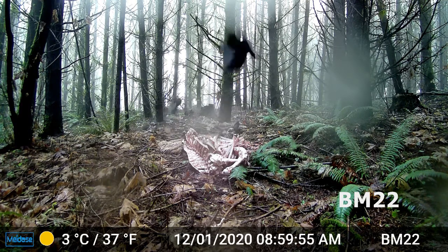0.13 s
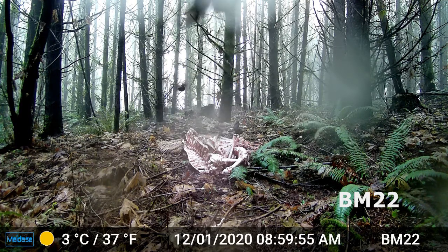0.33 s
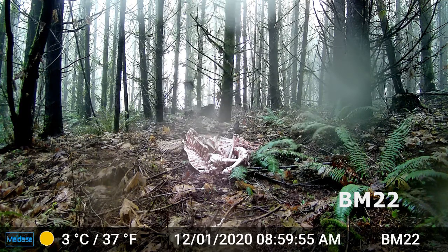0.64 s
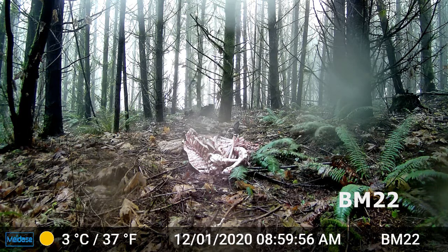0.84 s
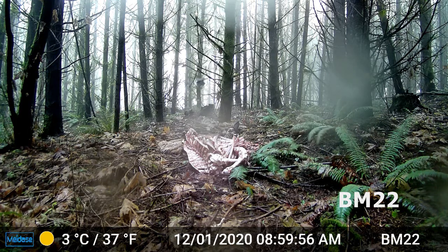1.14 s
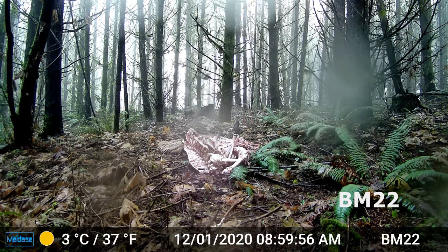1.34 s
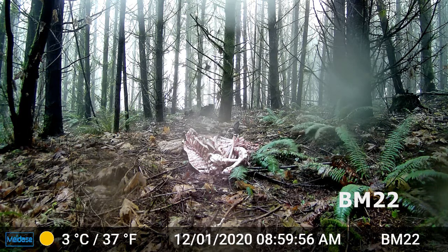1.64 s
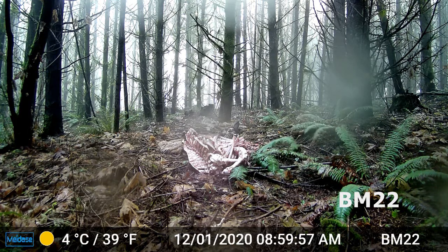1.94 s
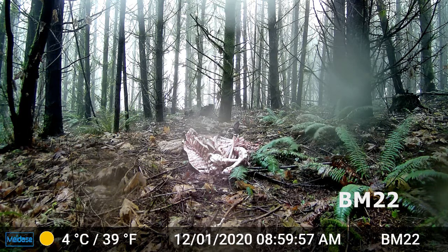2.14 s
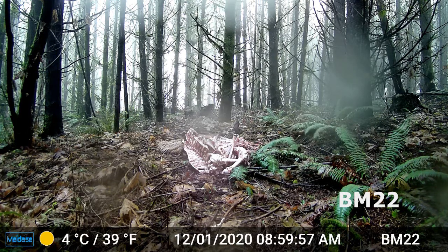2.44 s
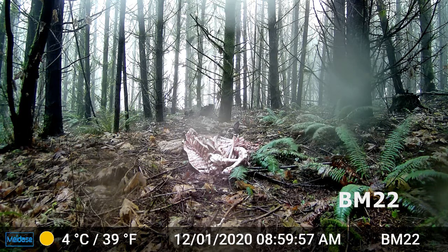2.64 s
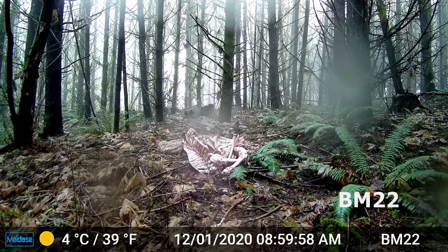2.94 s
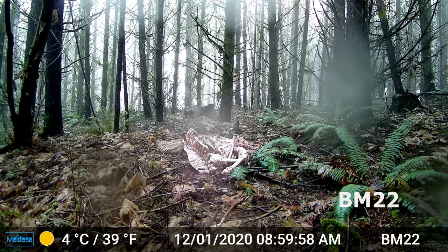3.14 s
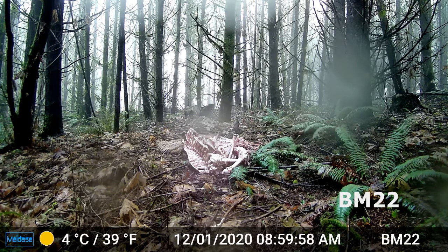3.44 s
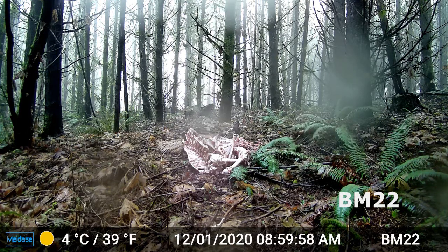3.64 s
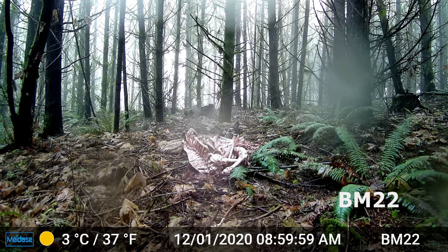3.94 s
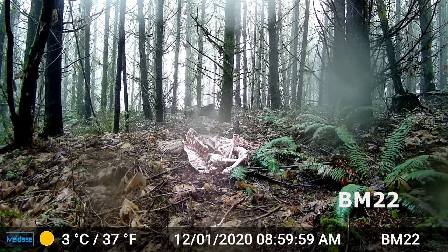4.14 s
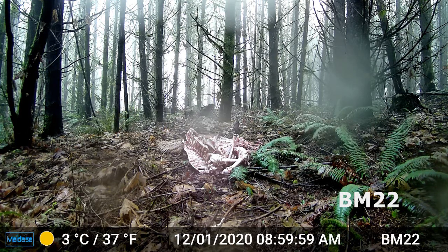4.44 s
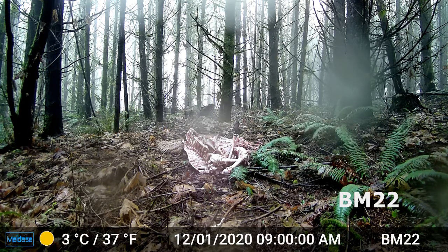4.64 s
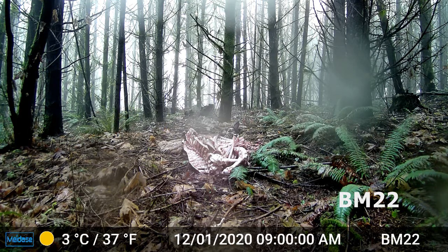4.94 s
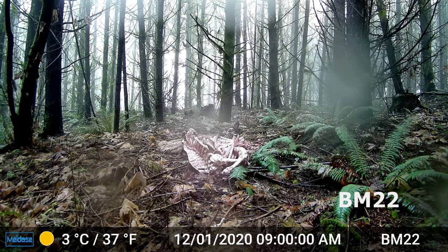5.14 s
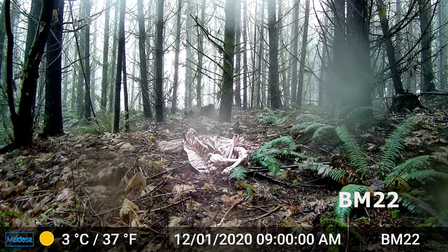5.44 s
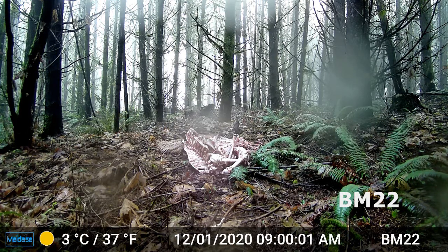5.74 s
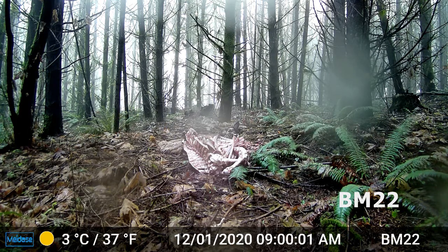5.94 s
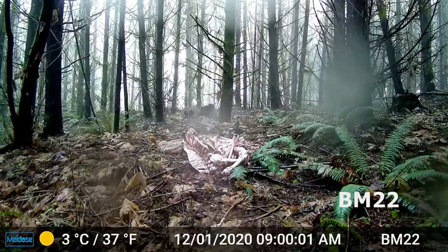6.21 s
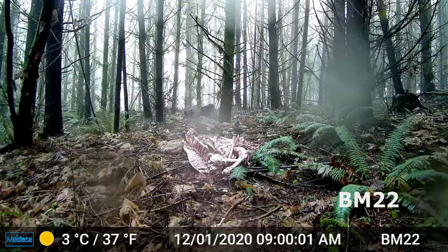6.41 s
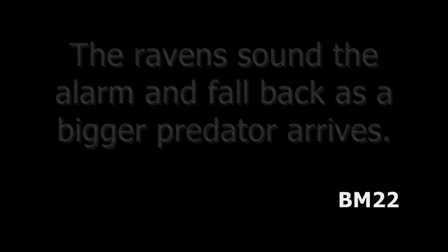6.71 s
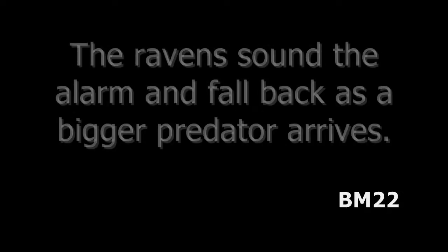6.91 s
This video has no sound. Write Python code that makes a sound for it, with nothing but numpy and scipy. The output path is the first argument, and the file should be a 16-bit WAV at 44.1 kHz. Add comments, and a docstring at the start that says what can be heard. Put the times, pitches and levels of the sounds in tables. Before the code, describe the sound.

Quiet woodland, close mono microphone, faint low air rumble and hiss. From 0 to 0.35 s, heavy wing strokes thump quickly as ravens lift off, with feathers swishing and dry leaves snapping. At 0.4 s a very loud, close, rough caw bursts out, a coarse rattle that overloads slightly. More wingbeats flutter at 0.7-0.95 s while a duller, farther caw at 0.7 overlaps a fuller one at 0.9. Another overlapping pair follows around 1.4-1.7 s, with a small leaf snap near 1.7, then two overlapping caws at 2.25-2.65 s with clearer echo. Single, hollower caws ring among the trunks at 2.9 and 3.4 s. Their echoes fade into near silence with soft low air swells until 5.3 s, when a nasal, grating caw returns, repeats at 5.9, and begins a stronger one at 6.6 that is chopped off abruptly at about 6.7 s, leaving silence.

```python
"""Ravens taking off in a wood

Ravens flap up from the forest floor and caw in alarm, a second bird overlapping the first.
Each caw is a slowing rattle of bursts; each burst is a train of syrinx pulses, rung through the throat.
Wing strokes are short air oscillations; feathers, leaves, rumble and hiss are shaped noise.
Trunks echo, the mono microphone overloads on the loudest peaks, and the sound stops dead."""
import sys
import numpy as np
from scipy import signal
from scipy.fft import rfft, irfft, next_fast_len
from scipy.io import wavfile
from scipy.ndimage import uniform_filter1d, map_coordinates

SR = 44100
rng = np.random.default_rng(int(sys.argv[2]) if len(sys.argv) > 2 else 0)


def bounce(signal):
    """Save signal as a 16-bit WAV file at the path given by the first command-line argument."""
    frames = np.transpose(np.atleast_2d(signal))
    limited = np.clip(frames, -1, 1)
    pcm = np.round(limited * 32767).astype(np.int16)
    wavfile.write(sys.argv[1], SR, pcm)


N = 311787

# open-beak throat resonances as heard from each perch: centre_hz, half_width_hz, relative_level_db
NEAR = [(527, 330, -8), (1130, 91, 2), (1454, 200, -1.5), (2064, 170, -13), (2750, 420, -7),
        (3360, 580, -11), (4760, 990, -17.5), (6800, 1300, -30)]
# same columns: centre_hz, half_width_hz, relative_level_db
OPEN = [(505, 400, -15), (1136, 310, 4.5), (1410, 170, -1), (1900, 450, -9.5), (2725, 150, -4),
        (3490, 390, -12), (4780, 570, -21.5), (7400, 1200, -55.5)]
# same columns: centre_hz, half_width_hz, relative_level_db
KEEN = [(480, 95, -15), (1146, 330, -4), (1270, 130, 0.5), (1702, 57, -3), (2070, 130, -12.5),
        (3050, 520, -14), (3800, 300, -17.5), (5070, 400, -20.5)]
# same columns: centre_hz, half_width_hz, relative_level_db
HOLLOW = [(590, 146, -20.5), (1150, 77, 0.5), (1310, 357, -14), (2050, 99, -32), (2895, 310, -24),
          (3850, 300, -26.5), (4730, 420, -30.5), (7170, 480, -49)]
# same columns: centre_hz, half_width_hz, relative_level_db
NASAL = [(451, 46, -16.5), (760, 340, -12.5), (1305, 124, 5), (1940, 470, -18), (2671, 295, -6.5),
         (3400, 142, -9), (3830, 370, -13.5), (5150, 500, -19), (7020, 420, -33)]
# same columns: centre_hz, half_width_hz, relative_level_db
FAR = [(476, 150, -31.5), (890, 430, -19), (1228, 180, -7), (1654, 320, -31), (2630, 81, -24.5),
       (3500, 480, -27.5), (5270, 273, -39.5)]
# echo decay among the trunks: frequency_hz, t60_s
TRUNKS = [(400, 0.31), (1100, 0.34), (3000, 0.33), (7500, 0.26)]


def amp(db):
    """Amplitude ratio of a level in dB."""
    return 10 ** (np.asarray(db) / 20)


def unit(x):
    """x at rms 1."""
    return x / np.sqrt(np.mean(x ** 2) + 1e-20)


def along(points, hz):
    """(Hz, value) points read on a log frequency axis."""
    f, v = np.transpose(points)
    return np.interp(np.log(hz + 1), np.log(f + 1), v)


def curve(points, t):
    """(position, value) points read at t."""
    position, value = np.transpose(points)
    return np.interp(t, position, value)


def wobble(knots_per_s, size):
    """A smooth random curve through normally distributed knots."""
    knots = rng.standard_normal(4000)
    return map_coordinates(knots, [np.arange(size) * knots_per_s / SR], mode="wrap")


def filtered(x, gain):
    """x times a frequency-dependent gain, without phase shift."""
    m = next_fast_len(len(x) + 8192)
    hz = np.fft.rfftfreq(m, 1 / SR)
    return irfft(rfft(x, m) * gain(hz), m)[:len(x)]


def cut(x, hz, kind):
    """Steep causal low-pass or high-pass."""
    return signal.sosfilt(signal.butter(10, hz, kind, fs=SR, output="sos"), x)


def noise(spectrum):
    """Coloured noise of rms 1."""
    return unit(filtered(rng.standard_normal(N), lambda hz: amp(along(spectrum, hz))))


def levelled(x, size=1500):
    """x with its slow level held near rms 1, bursts kept."""
    smooth = uniform_filter1d(x ** 2, size)
    power = np.abs(uniform_filter1d(smooth, size // 2))
    return x / np.sqrt(power + power.max() / 1000)  # floor limits the gain in silence


def add(track, start_s, x):
    """Mix x into the track, truncated at its end."""
    part = track[max(round(start_s * SR), 0):][:len(x)]
    part += x[:len(part)]


def tail(decay, size, uneven_db=3):
    """An uneven noise echo of energy 1 in which each frequency dies at its own speed."""
    source = rng.standard_normal(size) * amp(uneven_db * wobble(45, size))
    hz, t, z = signal.stft(source, SR, nperseg=256)
    fade = amp(-60 * t / along(decay, hz)[:, None])
    h = signal.istft(z * fade, SR, nperseg=256)[1]
    return h / np.linalg.norm(h)


def air(lumpy_db=2):
    """Lumpy low air noise with a few deeper swells, over a faint steady hiss."""
    # swells of low air on the microphone: centre_s, sigma_s, level_db
    gusts = [(.12, 0.18, -40), (0.863, .08, -37), (1.913, 0.017, -41), (2.245, 0.056, -41),
             (2.753, 0.12, -34), (3.106, 0.063, -37.5), (3.332, 0.055, -29.5), (3.946, 0.014, -38.5)]
    # gust spectrum: frequency_hz, relative_level_db
    gust_spectrum = [(12, -24), (30, 0), (55, 0.5), (80, -4.5), (130, -21), (300, -55), (880, -120)]
    # continuous rumble spectrum: frequency_hz, relative_level_db
    rumble_spectrum = [(12, -32), (20, -5.5), (59, -2.5), (86, -3.5), (140, -9), (177, -17.5), (206, -19.5),
                       (400, -41.5), (520, -60.5), (880, -120)]
    # hiss spectrum: frequency_hz, relative_level_db
    hiss_spectrum = [(180, -24), (300, -5), (360, -4.5), (380, -10.5), (586, -4.5), (753, -13.5), (891, -9),
                     (1370, -16), (5390, -20), (8420, -28.5), (10900, -57.5), (18500, -120)]
    rumble_db, hiss_db = -48, -61
    t = np.arange(N) / SR
    swells = sum(amp(db) * np.exp(-((t - s) / sigma_s) ** 2 / 2) for s, sigma_s, db in gusts)
    low = amp(rumble_db) * noise(rumble_spectrum) + swells * noise(gust_spectrum)
    return amp(lumpy_db * wobble(22, N)) * low + amp(hiss_db) * noise(hiss_spectrum)


def wings(grain_db=3, echo_db=-13):
    """Each stroke shoves a few cycles of air at the microphone; feathers swish and dry leaves snap."""
    # wing strokes: centre_s, peak_db, frequency_hz
    beats = [(0.045, -18.5, 168), (0.109, -20.5, 111), (0.156, -23.5, 139), (0.242, -25, 147),
             (0.288, -36, 94.5), (0.329, -19, 104), (0.719, -19.5, 149), (.815, -21.5, 240),
             (.925, -22.5, 142)]
    # air stirred around a stroke: frequency_hz, relative_level_db
    wash_spectrum = [(25, -25), (100, 1.5), (160, -1.5), (260, -3), (380, -15.5), (800, -57.5),
                     (1500, -120)]
    # feathers and leaves swishing, fainter as the birds settle: start_s, length_s, level_db
    swishes = [(0, 0.15, -34.5), (0.245, .04, -35), (0.348, .03, -44.5), (.65, 0.092, -47),
               (0.771, .12, -50), (1.822, 0.089, -49), (2.052, 0.052, -55)]
    # dry leaves and quills: start_s, level_db
    snaps = [(0.046, -26), (0.057, -19), (.125, -21), (.283, -22.5), (.659, -35), (0.724, -22),
             (1.718, -21.5), (1.889, -50)]
    # swish and snap spectrum: frequency_hz, relative_level_db
    rustle_spectrum = [(180, -28.5), (300, 0.5), (831, -10), (969, -2), (1470, -4), (3750, -10),
                       (4310, -16), (5390, -11), (8420, -26), (10900, -58), (18500, -120)]
    beat_sigma_cycles, wash_sigma_s, wash_re_beat_db = 0.98, .035, -15.5
    attack_s, release_s, snap_decay_s = .008, .022, .002  # exponential time constants
    t = np.arange(N) / SR
    near = np.arange(-SR // 10, SR // 10) / SR
    strokes, wash_level, swish = np.zeros(N), np.zeros(N), np.zeros(N)
    for s, db, hz in beats:
        phase = rng.uniform(0, 2 * np.pi) + .5 * wobble(hz / 2, len(near))
        swing = np.sin(2 * np.pi * hz * near + phase)
        envelope = np.exp(-(near * hz / beat_sigma_cycles) ** 2 / 2)
        strokes += np.interp(t, s + near, amp(db) * swing * envelope, 0, 0)
        wash_level += amp(db + wash_re_beat_db) * np.exp(-((t - s) / wash_sigma_s) ** 2 / 2)
    wash = noise(wash_spectrum) * wash_level
    for s, length_s, db in swishes:
        before_s = np.maximum(s - t, 0)
        after_s = np.maximum(t - s - length_s, 0)
        swish += amp(db) * np.exp(-before_s / attack_s - after_s / release_s)
    swish *= amp(grain_db * wobble(220, N))
    for s, db in snaps:
        add(swish, s, amp(db) * np.exp(-np.arange(SR // 20) / SR / snap_decay_s))
    rustle = swish * noise(rustle_spectrum)
    echo = amp(echo_db) * signal.fftconvolve(rustle, tail(TRUNKS, size=SR))[:N]
    return strokes + wash + rustle + echo


def syrinx(t, length_s, pitch_hz, period_s, growth, fullness, bend=.13, shut_db=-19):
    """Membrane pulses at the pitch, chopped into bursts that grow longer and fuller."""
    # pitch arch: share_of_caw, pitch_ratio
    arch = [(0, .7), (.15, 0.87), (.38, 0.95), (.56, 1.01), (.72, 0.93), (.87, 0.88), (1, .64)]
    # burst filling, before fullness: share_of_caw, voiced_share_of_period
    filling = [(0, 0.38), (.2, 0.31), (.45, 0.62), (.68, 0.67), (.86, 0.77)]
    share = t / length_s
    bursts = np.log1p(growth * t / period_s) / growth
    within = bursts % 1
    # pitch swings up and back inside every burst; no two cycles are alike
    jitter = .026 * wobble(600, len(t)) + .012 * wobble(90, len(t))
    swing = bend * (np.sin(np.pi * within ** 1.3) - .6)
    pitch = pitch_hz * curve(arch, share) * (1 + swing + jitter)
    cycles = np.cumsum(pitch) / SR
    # each burst starts the membranes afresh
    cycles -= cycles[np.searchsorted(bursts, np.floor(bursts))]
    pulses = 1. * (np.diff(cycles % 1, prepend=1) < 0)
    opening = fullness * curve(filling, share)
    voiced = 1 / (1 + np.exp(np.clip((within - opening) / .06, -30, 30)))
    swell = 1 + .5 * np.sin(np.pi * np.minimum(within / opening, 1))
    # air hisses through with each pulse, mostly in the treble
    puffs = unit(rng.standard_normal(len(t)) * np.exp(-3 * (cycles % 1)))
    hiss = filtered(puffs, lambda hz: np.interp(hz, [1200, 4000], [.3, 1]))
    strength = amp(1.3 * wobble(300, len(t))) * (voiced * swell + amp(shut_db))
    end_fade = np.clip((length_s - t) / 0.0061, 0, 1)
    return (unit(pulses) + hiss) * strength * end_fade


def resonate(x, modes, size=4096):
    """Causal minimum-phase throat colour: each resonance rings after every pulse."""
    f = np.fft.rfftfreq(size, 1 / SR)
    power = sum(amp(db) ** 2 / (1 + ((f - hz) / width) ** 2) ** 2 for hz, width, db in modes)
    bass_cut = (f + 1) ** 4 / (f ** 4 + 350 ** 4)
    cep = irfft(np.log(power * bass_cut) / 2)
    # folding the cepstrum makes the response causal
    cep[1:size // 2] *= 2
    cep[size // 2 + 1:] = 0
    return signal.fftconvolve(x, irfft(np.exp(rfft(cep))))[:len(x)]


def beak(source, throat, shut_ratio, t, length_s, count=4):
    """The resonances slide up as the beak opens and down as it closes."""
    open_s, close_s = 0.027, 0.006  # exponential time constants
    opening = (1 - np.exp(-t / open_s)) * (1 - np.exp(np.minimum(t - length_s, 0) / close_s))
    voice = np.zeros(len(t))
    # crossfade between fixed beak positions
    for k, ratio in enumerate(np.linspace(shut_ratio, 1, count)):
        weight = np.clip(1 - np.abs(opening * (count - 1) - k), 0, 1)
        voice += weight * resonate(source, [(hz * ratio, width, db) for hz, width, db in throat])
    return voice


def effort(share, swell_db):
    """Level in dB below the crest: a caw swells quickly at first, crests and sags at its end."""
    crest_share, swell_curve, sag_db = 0.63, 2.46, 5.5
    rising = np.clip(1 - share / crest_share, 0, 1)
    falling = np.clip((share - crest_share) / (1 - crest_share), 0, 1)
    return -swell_db * rising ** swell_curve - sag_db * falling ** 2


def scattered(x, db, spread_s, drift_rad_per_s=14, size=2200):
    """Twigs and ferns on the way blur each pulse; the paths drift as the bird moves its head."""
    t = np.arange(size) / SR
    paths = rng.standard_normal((2, size)) * np.sqrt(t) * np.exp(-t / spread_s)
    a, b = [signal.fftconvolve(x, h / np.linalg.norm(h))[:len(x)] for h in paths]
    turn = drift_rad_per_s * np.arange(len(x)) / SR
    return x + amp(db) * (np.cos(turn) * a + np.sin(turn) * b)


def lead_in(body, rasp, t, lead_s):
    """A caw starts as a soft, dull knocking; then the voice catches and the rasp comes in."""
    dull_hz, soft_db, fade_s = 1380, -4.5, 0.0014
    clear_leads = 3.6  # the dullness lifts over this many lead-in lengths
    caught = np.clip(1 + (t - lead_s) / fade_s, 0, 1)
    clear = np.clip(t / (clear_leads * lead_s), 0, 1) ** 2
    dull = filtered(body, lambda hz: 1 / (1 + (hz / dull_hz) ** 14))
    body = clear * body + (1 - clear) * dull
    return body * amp(soft_db * (1 - caught)), rasp * caught


def ravens(split_hz=2150, narrow_hz=4200, deep_db=-19, treble_echo_db=3, size=17000):
    """Each caw's pulses pass the throat, swell, change brightness and ring out among the trees."""
    # caws: start_s, length_s, pitch_hz (before arch and swing), first_burst_period_s,
    # period_growth_s_per_s, voice, level_db, swell_db, treble_db, brightening_over_caw_db, echo_db
    caws = [(0.379, 0.24, 521.4, .0097, .08, "near", -5, 12.5, -4.5, 4.5, -20.5),
            (.724, .25, 434.7, .0103, .022, "far", -17, 13, -18, -5, -9.5),
            (0.867, .2, 506.2, .0123, .053, "open", -10, 0, -8.5, 5, -15.5),
            (1.365, .24, 429.6, 0.0089, 0.027, "far", -19, 14.5, -16.5, 9, -10),
            (1.476, 0.23, 494.2, 0.012, 0.043, "open", -12.5, 14.5, -14, 12.5, -9.5),
            (2.255, 0.26, 524, .011, 0.064, "keen", -15.5, 10, -9, 6.5, -5),
            (2.402, .26, 439.8, 0.0091, 0.033, "keen", -23.5, 17.5, -5, -8.5, -8.5),
            (2.892, 0.22, 558.3, 0.0099, 0.062, "hollow", -11, 16.5, -15, 11.5, -6),
            (3.411, .217, 568.5, .009, .078, "hollow", -10, 11, -19, 20.5, -10),
            (5.286, .32, 454, 0.0094, 0.036, "nasal", -17, 20.5, -4, -6, -6.5),
            (5.92, 0.27, 453.4, 0.013, 0.039, "nasal", -16, 20.5, -3.5, -6, -8.5),
            (6.6, 0.31, 466, 0.012, .05, "nasal", -11, 22.5, -7.5, -7.5, 0)]
    # voices by name: throat, lead_in_s, gape_time_share_of_caw, treble_blur_db,
    # shut_to_open_resonance_ratio, burst_fullness_ratio, late_echo_db
    voices = {"near": (NEAR, 0.0016, .29, -7, .82, 1.4, -30), "far": (FAR, 0.0087, 1.6, 5.5, .9, 1.13, -30),
              "open": (OPEN, 0.028, 0.11, -8, 0.87, 1.0, -31),
              "keen": (KEEN, 0.02, 0.67, 1, .8, 1.15, -26.5),
              "hollow": (HOLLOW, 0.024, 0.86, 5, 0.93, 1, -25),
              "nasal": (NASAL, 0.0011, .08, -9, .89, 1, -33.5)}
    # long echo decay deeper in the wood: frequency_hz, t60_s
    deep_wood = [(400, 0.31), (1150, 1.6), (3500, 1.3), (7500, 0.62)]
    echo_delay_s, far_stand_delay_s = .02, .14
    out, t = np.zeros(N), np.arange(size) / SR
    for (s, length_s, pitch_hz, period_s, growth, name,
         level_db, swell_db, treble_db, brighten_db, echo_db) in caws:
        throat, lead_s, gape_share, blur_db, shut_ratio, fullness, late_db = voices[name]
        share = np.minimum(t / length_s, 1)
        source = syrinx(t, length_s, pitch_hz, period_s, growth, fullness)
        voice = beak(source, throat, shut_ratio, t, length_s)
        low, high = cut(voice, split_hz, "lowpass"), cut(voice, split_hz, "highpass")
        # the top of the treble comes in as the beak opens
        gape = np.clip(0.1 + t / (gape_share * length_s), 0, 1)
        narrow = filtered(high, lambda hz: 1 / (1 + (hz / narrow_hz) ** 10))
        high = gape * high + (1 - gape) * narrow
        release = np.exp(-np.maximum(t - length_s, 0) / 0.0096)
        loudness = amp(level_db + effort(share, swell_db)) * release
        brightness = amp(treble_db + brighten_db * (share - .5))
        # bass and treble scatter separately
        body = loudness * levelled(scattered(low, db=-19, spread_s=.007))
        rasp = loudness * brightness * levelled(scattered(high, db=blur_db, spread_s=0.0052))
        body, rasp = lead_in(body, rasp, t, lead_s)
        call = body + rasp
        echo = tail(TRUNKS, size=2 * SR) + amp(deep_db) * tail(deep_wood, size=2 * SR)
        late_echo = signal.fftconvolve(call, tail(TRUNKS, size=SR))
        wood_echo = signal.fftconvolve(body + amp(treble_echo_db) * rasp, echo)
        add(out, s, call)
        add(out, s + far_stand_delay_s, amp(late_db) * late_echo)
        add(out, s + echo_delay_s, amp(echo_db) * wood_echo)
    return out


def scene():
    """One microphone feeds both channels."""
    return np.tile(air() + wings() + ravens(), (2, 1))


def record(dry):
    """The microphone rounds off the loudest peaks; the sound stops dead and loses its top treble."""
    ceiling, stop_s, top_hz = .79, 6.676, 8000
    clipped = dry / (1 + np.abs(dry / ceiling) ** 6) ** (1 / 6)
    running = np.arange(N) / SR < stop_s
    return np.array([filtered(x * running, lambda hz: 1 / np.hypot(1, (hz / top_hz) ** 45))
                     for x in clipped])


dry = scene()
out = record(dry)
bounce(out)
```